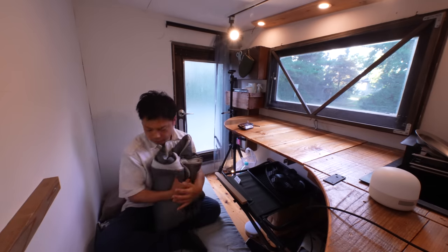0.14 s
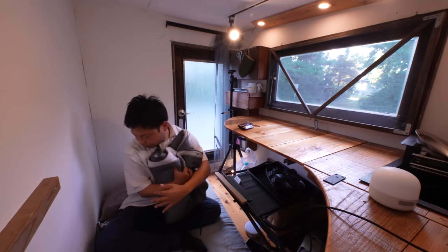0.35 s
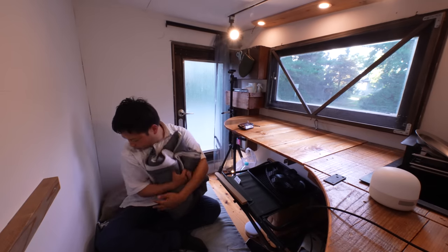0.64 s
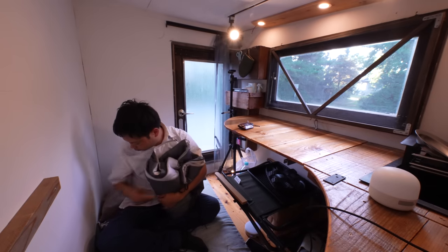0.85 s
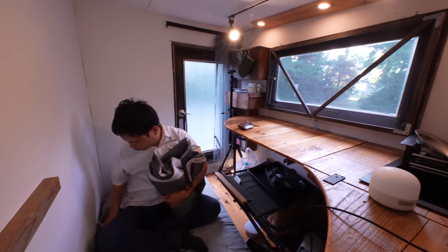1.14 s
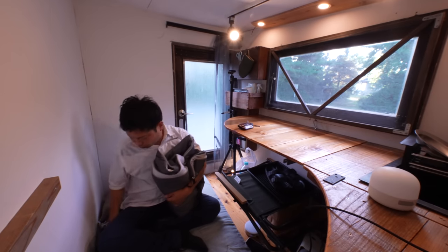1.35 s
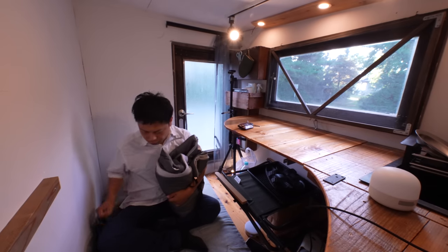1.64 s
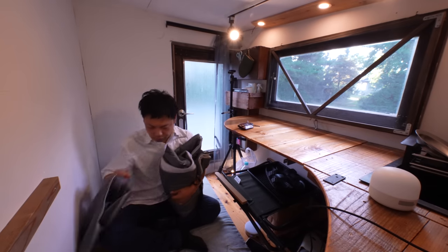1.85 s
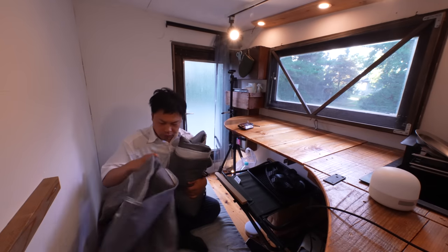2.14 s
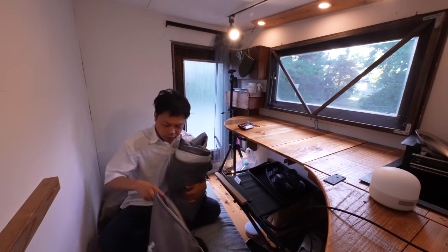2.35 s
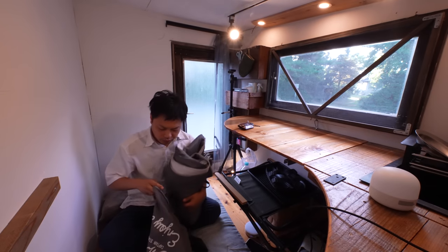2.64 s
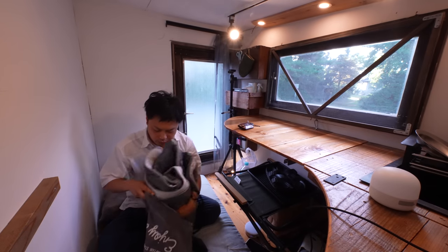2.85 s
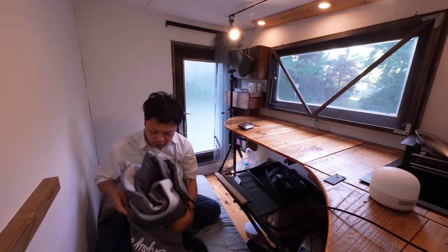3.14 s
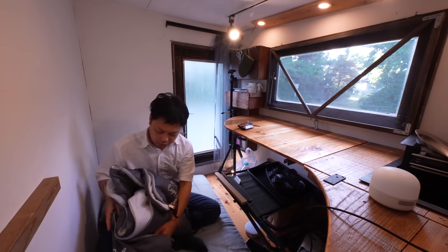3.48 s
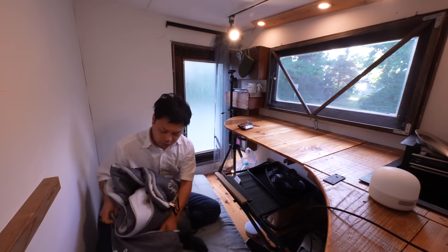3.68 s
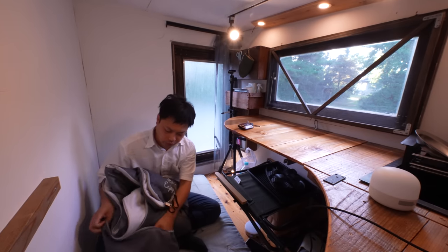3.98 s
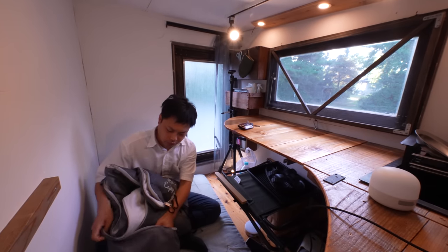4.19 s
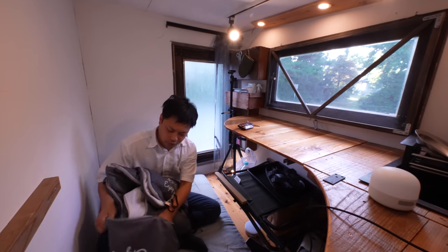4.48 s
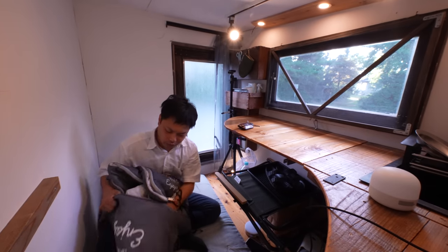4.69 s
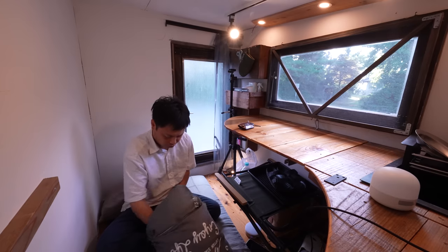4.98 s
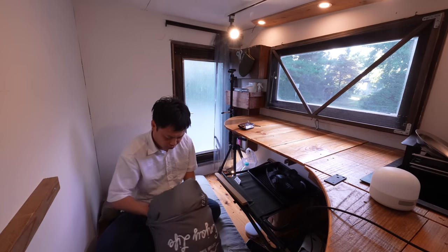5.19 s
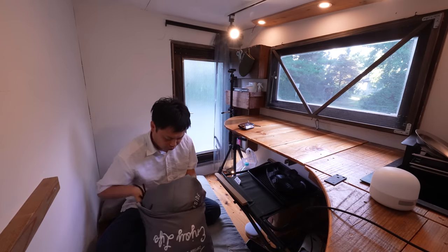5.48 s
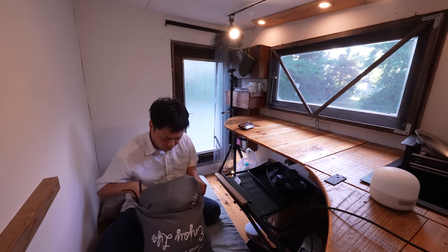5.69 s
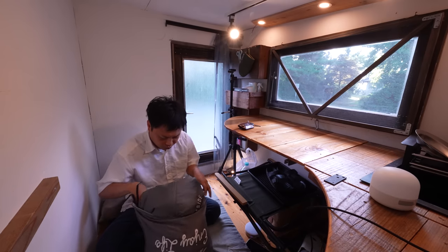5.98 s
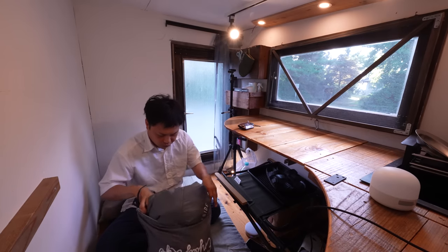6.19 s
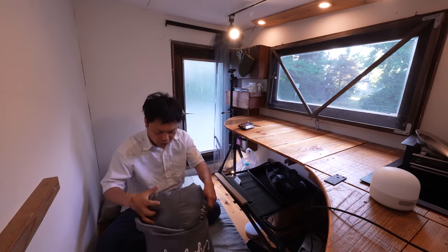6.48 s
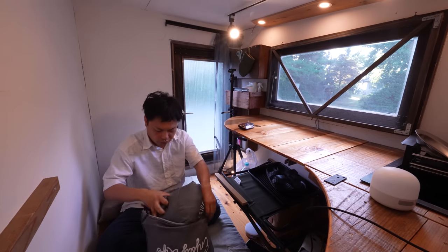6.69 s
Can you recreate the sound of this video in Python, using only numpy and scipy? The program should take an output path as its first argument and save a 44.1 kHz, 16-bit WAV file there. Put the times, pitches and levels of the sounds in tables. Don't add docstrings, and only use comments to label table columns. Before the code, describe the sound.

A padded nylon sleeping bag is handled close to a microphone in a small wooden cabin, with short reflections, faint outdoor rumble and light hiss. From 0 to 1 s, soft swishes come with crease snaps, dull knee bumps and woody raps, swelling to a brighter rustle near 0.85. At 1.3 a very loud, hard knock on a bench rebounds several times within 0.05 s, rattling briefly. Around 1.66-1.72 an edge skids in a rasping stutter, and crisp bright fabric strokes continue to 1.9. From 2 to 3 s rubbing is softer, with raps near 2.4 and thin ticks at 2.6. Sharp metallic-plastic ticks sound at 3.06, a rap at 3.25, then quiet stuffing. A fuller rustle and low thumps arrive at 4.85, with steady swishing after. Ticks and a rap cluster at 6.37; brief squeaks and a rising chirp occur at 6.6-6.8 amid rubbing.

```python
import sys
import numpy as np
from scipy import signal
from scipy.fft import rfft, irfft, next_fast_len
from scipy.io import wavfile
from scipy.ndimage import uniform_filter1d

SR = 44100
rng = np.random.default_rng(int(sys.argv[2]) if len(sys.argv) > 2 else 0)


def attenuation_scalar(level_db):
    decades = np.asarray(level_db, float) / 20
    return 10 ** decades


def to_wav(s):
    ch = np.atleast_2d(s).T
    pcm = np.round(np.clip(ch, -1, 1) * 32767)
    wavfile.write(sys.argv[1], SR, pcm.astype(np.int16))


N = 301203

# frequency_hz, density_db (per Hz)
CLOTH = [(60, -35), (100, -5), (135, -2.5), (174, 3.5), (229, -4), (335, -1), (481, -10.5), (621, -8),
         (1230, -6.5), (1480, -17.5), (2000, -17), (4000, -16.5), (8000, -27), (16000, -31)]
# peak_s, level_db, rise_s, fall_s
SQUEEZES = [(0.0, -54, .1, 0.3), (.15, -60, .3, 0.37), (.37, -49.5, 0.44, 0.24), (.72, -81, .3, 0.98),
            (.836, -44.5, 0.23, 0.064), (1.03, -63, 0.9, 0.069), (1.4, -66, 0.32, 0.27),
            (1.558, -59, 0.11, 0.034), (1.76, -54.5, 0.25, 0.25), (2.19, -56, 1, 0.082),
            (2.628, -52, 0.4, 0.09), (2.8, -55.5, 0.26, 0.51), (3.2, -71, 0.25, .3),
            (3.389, -53.5, 0.36, 0.19), (3.7, -63.5, 0.12, 0.89), (3.93, -71, 0.59, 0.68),
            (4.3, -70.5, 0.6, 0.31), (4.852, -47.5, 0.29, 0.092), (5.13, -51.5, 0.48, 0.45),
            (5.37, -53.5, 0.52, 0.82), (5.85, -86, 0.4, 0.08), (6.1, -64.5, 0.15, 0.96),
            (6.43, -56, 0.27, 0.091), (6.616, -52, 0.21, 0.45), (6.8, -63, .5, 0.19)]


def evened(x):
    return x / np.sqrt(np.mean(x ** 2) + 1e-20)


def read(points, hz):
    f, value = np.transpose(points)
    return np.interp(np.log(hz + 1), np.log(f + 1), value)


def add(mix, start_s, sound):
    part = mix[round(start_s * SR):][:len(sound)]
    part += sound[:len(part)]


def coloured(x, points, low_hz=17.0, high_hz=40300.0, skirt=0.31):
    size = next_fast_len(len(x))
    hz = np.fft.rfftfreq(size, 1 / SR) + 1
    above_low = 1 / (1 + np.exp(-np.log2(hz / low_hz) / skirt))
    above_high = 1 / (1 + np.exp(-np.log2(hz / high_hz) / skirt))
    gain = attenuation_scalar(read(points, hz)) * np.sqrt(above_low * (1 - above_high))
    return irfft(rfft(x, size) * gain, size)[:len(x)]


def wander(hz):
    b, a = signal.butter(2, hz / (SR / 2))
    return evened(signal.lfilter(b, a, rng.standard_normal(N)))


def slips(per_s, spread_db, hiss, clump_db, clump_hz):
    size = attenuation_scalar(spread_db * np.minimum(rng.exponential(1, N), 5)) * rng.standard_normal(N)
    clicks = evened(size * (rng.random(N) < per_s / SR))
    return (clicks + hiss * rng.standard_normal(N)) * attenuation_scalar(clump_db * wander(clump_hz))


def swell(peak_s, level_db, rise_s, fall_s):
    grid = np.arange(0, N + 64, 64)
    since = grid / SR - peak_s[:, None]
    away = np.where(since < 0, since / rise_s[:, None], -since / fall_s[:, None])
    power = (attenuation_scalar(level_db[:, None] + 20 * away) ** 2).sum(0)
    return np.interp(np.arange(N), grid, 10 * np.log10(power + 1e-12))


def mottled(x, depth_db, wide, long):
    z = signal.stft(x, nperseg=512)[2]
    patches = uniform_filter1d(rng.standard_normal(z.shape[::-1]).T, wide, axis=0)
    patches = evened(uniform_filter1d(patches, long, axis=1))
    return signal.istft(z * attenuation_scalar(depth_db * patches), nperseg=512)[1][:N]


def cloth():
    # peak_s, level_db, rise_s, fall_s,
    # brightness_db
    strokes = [(0.0, -50.5, .1, 0.09, -4), (.084, -54, 0.013, 0.12, -13),
               (.143, -76, 0.023, .15, -5), (.41, -47.5, 0.91, 0.27, -2.5),
               (.51, -61, .1, 0.05, -15), (.605, -56, 0.033, .3, -8), (.72, -53.5, 0.2, 0.22, -5),
               (.84, -43.5, 0.2, 0.094, 0.5), (1.03, -55, 0.45, 0.1, -3.5), (1.2, -70, .3, .3, -5),
               (1.43, -58.5, 0.097, 0.071, -7.5), (1.558, -53.5, 0.073, 0.1, -41),
               (1.684, -42, 0.08, 0.14, 1), (1.75, -49.5, 0.11, 0.16, 12.5),
               (1.82, -46, 0.09, .15, 6.5), (1.895, -47, 0.15, 0.037, 7.5),
               (1.98, -56, 0.33, 0.36, 1.5), (2.18, -55, 0.93, 0.12, -3.5),
               (2.4, -55.5, 0.067, 0.67, -13), (2.62, -53, 0.24, 0.13, -7),
               (2.79, -55.5, 0.72, 1.3, -3), (2.93, -55.5, 0.89, 0.22, -13),
               (3.18, -62, 0.17, 0.27, -15), (3.26, -54.5, 0.042, 0.71, -18),
                     (3.42, -57, 0.44, 0.16, -3), (3.77, -58.5, 0.19, 0.58, -6),
                     (3.92, -57.5, 0.33, 0.084, -0.5), (4.025, -61, 0.089, 0.079, -7),
                     (4.25, -69.5, 0.86, 1, 3), (4.64, -54.5, 0.22, 1, -2.5), (4.84, -44, 0.2, 0.11, 2.5),
                     (5.12, -52.5, 0.4, 0.32, 2.5), (5.37, -51, 0.67, 0.81, -3.5), (5.62, -52, 1, 0.2, 0),
                     (5.74, -53.5, 0.098, 0.23, 0.5), (5.879, -57.5, 0.44, 0.04, -4),
                     (6.1, -53.5, 0.22, 0.21, -3.5), (6.33, -55, 0.41, 0.27, -5),
                     (6.43, -53, 0.26, 0.23, -2.5), (6.55, -49.5, 0.051, 0.36, -13),
                     (6.62, -51.5, 0.28, 0.88, -0.5), (6.83, -50, 0.16, 0.12, -7)]
    peak_s, db, rise, fall, bright = np.transpose(strokes)
    fizz = coloured(slips(1600, 1.3, 3.3, 0.93, 42), CLOTH, low_hz=9300.0, skirt=0.23)
    sheen = coloured(slips(2000, 2.4, 2.7, 1.2, 37), CLOTH, 5200.0, 7670.0, 0.28)
    swish = coloured(slips(1200, 2.0, 2.14, 0.72, 26), CLOTH, 1556.0, 5650.0, 0.067)
    padding = coloured(slips(400, 1.8, 1.6, 0.27, 33), CLOTH, 530.0, 1380.0)
    fizz_db = swell(peak_s, db - 1.54 + 1.17 * bright, rise, fall)
    sheen_db = swell(peak_s, db - 2.5 + 0.73 * bright, rise, fall)
    swish_db = swell(peak_s, db, rise, fall)
    padding_db = swell(*np.transpose(SQUEEZES))
    parts = ((fizz, fizz_db), (sheen, sheen_db), (swish, swish_db), (padding, padding_db))
    rubbing = sum(evened(x) * attenuation_scalar(level) for x, level in parts)
    return mottled(rubbing, depth_db=1.43, wide=4, long=12)


def boards():
    peak_s, db, rise, fall = np.transpose(SQUEEZES)
    delay_s, lag_s = 0.022, 0.16
    pressure_db = uniform_filter1d(swell(peak_s + delay_s, db, rise, fall), round(lag_s * SR))
    pushes = evened(coloured(slips(150, 2.5, 1.64, 2.1, 6.0), CLOTH, 120.0, 325.0))
    return pushes * attenuation_scalar(-58.5 + 0.57 * (pressure_db - np.median(pressure_db)))


def squeaks():
    # start_s, length_ms, level_db, start_hz, end_hz
    glides = [
        (3.52, 26, -55, 1710, 1670),
        (6.444, 16, -48, 1980, 1960),
        (6.757, 24, -47, 680, 860),
        (6.771, 26, -44, 850, 970),
        (6.803, 22, -49, 1030, 1300),
        (6.674, 14.3, -42, 404, 720),
        (6.627, 10, -45, 2080, 1400),
    ]
    # start_s, length_ms, level_db, centre_hz, width_hz
    rasps = [(.81, 35, -49, 910, 500), (1.66, 59, -33.5, 2030, 2000), (1.58, 120, -49, 10800, 1600),
             (1.585, 56, -57, 7700, 900), (1.625, 36, -52, 6900, 700), (1.668, 31, -34.5, 1130, 210),
             (1.662, 51, -45, 3800, 1000), (8.3, 40, -49, 4250, 400), (6.372, 25, -40, 4100, 1500),
             (5.06, 82, -56, 750, 110), (5.2, 84, -58, 630, 87), (5.27, 77, -58, 618, 80),
             (5.34, 100, -59, 637, 90), (2.525, 33, -56.5, 4100, 500), (6.634, 18, -54, 4250, 400),
             (1.665, 54, -43.5, 700, 440), (2.552, 61, -50.5, 3600, 5400), (6.365, 33, -44, 2260, 5800),
             (6.665, 44, -48.5, 720, 580)]
    # bandwidth in Hz, steady slip against flutter
    rows = [(s, ms, db, hz0, hz1, 0.2 * hz0, 2.1) for s, ms, db, hz0, hz1 in glides]
    rows += [(s, ms, db, hz, hz, width, 0) for s, ms, db, hz, width in rasps]
    out = np.zeros(N)
    for start_s, ms, db, hz0, hz1, width, tone in rows:
        count = round(min(ms, 90) * SR / 1000)
        carrier = np.exp(2j * np.pi * np.cumsum(np.linspace(hz0, hz1, count)) / SR)
        r = np.exp(-np.pi * width / SR)
        grit = rng.standard_normal(4096) + 1j * rng.standard_normal(4096)
        flutter = signal.lfilter([1], [1, -2 * r, r * r], grit)[-count:]
        slip = flutter / abs(flutter).mean() + tone
        add(out, start_s, attenuation_scalar(db) * evened((carrier * slip).real) * np.sqrt(np.hanning(count)))
    return out


def causal(db):
    cepstrum = irfft(np.log(attenuation_scalar(db)))
    half = len(cepstrum) // 2
    fold = np.r_[1, np.full(half - 1, 2), 1, np.zeros(half - 1)]
    return np.exp(rfft(cepstrum * fold))


def ticks(rows, octaves):
    out = np.zeros(N)
    t = (np.arange(2048) - 128) / SR
    hz = np.fft.rfftfreq(2048, 1 / SR) + 1
    for start_s, db, centre_hz, ms in rows:
        lean_db = np.maximum(-6 * (np.log2(hz / centre_hz) / octaves) ** 2, -60)
        snap = 3.5 * np.sqrt(ms) * (t == 0)
        decay = np.exp(-abs(t) * 1000 / ms) * (t >= 0)
        shake = (rng.standard_normal(2048) + snap) * decay
        burst = irfft(rfft(shake) * causal(lean_db + read(CLOTH, hz)))
        add(out, start_s + t[0], attenuation_scalar(db) * burst / abs(burst).max())
    return out


def creases():
    # start_s, peak_db, centre_hz, length_ms
    snaps = [(.0838, -32, 1500, 2.1), (.1402, -32, 1880, 3.8), (.3085, -34, 1890, 1.3),
             (.3625, -39, 1400, 1.5), (.587, -40.5, 2000, 2), (.678, -38, 2400, 1.3),
             (.9301, -35.5, 11300, 2.4), (1.0125, -49, 3980, 3.2), (2.319, -42, 2000, 1.1),
             (2.4893, -43.5, 6500, 1), (2.562, -33, 4000, 2.5), (.872, -27.5, 13000, 6.3),
             (2.5636, -39, 11900, 1.5), (2.8993, -42, 10000, 1), (3.8217, -41, 7250, 0.94),
             (1.014, -42, 9000, 5), (3.0573, -32, 7050, 2.7), (3.248, -36.5, 2780, 2),
             (3.2575, -33.5, 2300, 3), (3.066, -36, 6000, 9.6), (3.7693, -44, 4220, 3),
             (3.897, -53, 3860, 5), (6.293, -45, 3340, 8.8), (6.5465, -28.5, 11100, 2.7)]
    return ticks(snaps, octaves=0.79)


def ring(modes, lean_db, stretch):
    t = np.arange(SR // 4) / SR
    hz, db, t60 = np.transpose(modes)[:, :, None]
    sign = (-1.) ** np.arange(len(modes))[:, None]
    decay = attenuation_scalar(db + lean_db - 60 * t / (t60 * stretch))
    return (sign * decay * np.sin(2 * np.pi * hz * t)).sum(0)


def cord_lock():
    # start_s, peak_db, centre_hz, length_ms
    clicks = [(.0717, -41, 6900, 1.5), (.73, -44, 11500, 2.5), (2.591, -58, 6500, 1.3),
              (2.591, -35, 15300, 3.6), (2.601, -39, 15400, 4), (1.312, -35, 4220, 1.8),
              (1.341, -31, 4240, 5), (1.35, -45, 4200, 3.6), (3.058, -33, 15700, 3),
              (3.059, -28, 10800, 4.7), (3.071, -29, 14800, 6), (6.3575, -33, 7660, 0.83),
              (6.363, -36, 3200, 4), (6.547, -31, 13500, 2.3), (6.369, -29, 9100, 2.8),
              (6.372, -31, 3900, 6.3), (6.378, -35, 14800, 9), (6.385, -31.5, 9300, 3.5),
              (6.4873, -41, 4280, 4.4), (6.567, -36, 9900, 2.7), (6.569, -33, 14300, 4)]
    # start_s, frequency_hz, level_db, t60_s
    tones = [(3.059, 6150, -41, .03), (3.0575, 4150, -47, .09), (3.0585, 15500, -27, .02),
             (3.06, 11500, -42, .03), (3.062, 5200, -45, .05), (3.385, 5400, -56, .05),
             (2.592, 15100, -45, .07), (2.592, 7810, -51, .05), (2.566, 13900, -51, .07),
             (.862, 13700, -52, .08), (.862, 9650, -53, .07), (6.567, 10050, -41, .05),
             (6.357, 7890, -42, .02), (6.372, 9650, -47, .13), (6.372, 13700, -50, .15),
             (6.387, 5200, -36, .045), (6.384, 4250, -43, .035), (6.385, 9700, -43, .06),
             (6.553, 13700, -51, .15), (6.6, 9650, -54, .25), (6.487, 13700, -53, .05)]
    rings = np.zeros(N)
    for start_s, *mode in tones:
        add(rings, start_s, ring([mode], 0, 0.84))
    return ticks(clicks, octaves=0.27) + rings * attenuation_scalar(4 * wander(120))


def bumps(rows, stretch):
    # frequency_hz, level_db, t60_s
    panels = [(64.4, -15, 0.47), (108, -5, 0.17), (175, -3.5, 0.27), (212, -9, 0.21), (275, 4, 0.1),
              (327.8, -3.5, 0.21), (419, -1, 0.099), (504, -13, 0.24), (615, 7, 0.048), (800, 7, 0.045),
              (890, 18, 0.022), (1018, 12, 0.08), (1125, 13, 0.04), (1940, 13, 0.066), (2700, -10, .03)]
    out, hz = np.zeros(N), np.transpose(panels)[0][:, None]
    for start_s, db, centre_hz, octaves in rows:
        lean_db = -6 * (np.log2(hz / centre_hz) / max(octaves, 0.2)) ** 2
        grit = 1 + 0.59 * rng.standard_normal(256)
        contact = grit * np.exp(-6.5 * centre_hz * np.arange(256) / SR)
        sound = signal.oaconvolve(ring(panels, lean_db, stretch), contact)
        add(out, start_s, attenuation_scalar(db) * sound / abs(sound).max())
    return out


def thuds_and_raps():
    # start_s, peak_db, centre_hz, spread_octaves
    thuds = [(.157, -31, 286, 0.86), (.17, -35, 73.5, 0.3), (.185, -38.5, 333, 0.55), (.286, -37, 363, 0.4),
             (.373, -36.5, 175, 0.65), (.591, -43, 182, 0.21), (.751, -35.5, 322, 0.8),
             (.843, -36, 178, 0.92), (1.725, -32.5, 186, 0.48), (1.797, -27, 233, 1.1),
             (2.384, -40.5, 229, 0.58), (2.422, -32.5, 330, 1.3), (2.799, -44, 170, 0.82),
             (2.968, -41.5, 220, 1.5), (3.269, -43, 261, 0.095), (4.885, -37.5, 200, 0.76),
             (4.903, -32.5, 168, 0.37), (4.979, -37, 275, 0.22), (5.135, -38, 178, 0.89),
             (5.19, -40.5, 189, 0.42), (5.561, -38, 149, 0.54), (5.605, -41.5, 202, 0.38),
             (6.222, -44.5, 186, 0.54), (.681, -41.5, 167, 0.51), (1.897, -39, 171, 0.8),
             (2.69, -48, 315, 0.17), (3.37, -61, 202, 0.33), (4.756, -52, 250, 0.46),
             (5.02, -42.5, 180, 0.97), (5.052, -44, 199, .5), (5.24, -44, 175, 0.58),
             (5.36, -49, 380, 0.29), (5.42, -42.5, 170, 0.47), (1.81, -39, 303, 1.03)]
    # start_s, peak_db, centre_hz, spread_octaves
    raps = [(.083, -50, 1210, 0.63), (.141, -31.5, 463, 0.84), (.247, -27.5, 597, 0.65),
            (.309, -48, 800, 0.93), (.363, -31.5, 890, 1.3), (.258, -50, 700, .8), (.54, -41.5, 680, 0.58),
            (.59, -41, 646, 0.31), (.679, -38.5, 550, 0.61), (1.694, -32, 417, 0.39),
            (2.318, -52, 1100, 0.32), (2.376, -40.5, 717, 0.17), (2.405, -29.5, 455, 0.84),
            (3.2478, -30.5, 860, 0.87), (3.251, -37, 298, 0.84), (3.268, -47, 330, .6),
            (3.378, -42, 1100, 0.84), (6.374, -29.5, 647, 0.41), (6.672, -39.5, 1060, 0.35),
            (6.688, -38, 1050, .4), (1.539, -50.5, 602, 0.44), (.38, -43, 700, 1.1)]
    return bumps(thuds, stretch=0.54) + bumps(raps, stretch=0.87)


def skid():
    # start_s, level_db
    jerk_rows = [(1.661, -39), (1.665, -47), (1.669, -31), (1.6738, -30), (1.6768, -33), (1.6785, -23.5),
                 (1.6803, -30), (1.6822, -32), (1.684, -30), (1.688, -28), (1.690, -47), (1.6915, -25),
                 (1.6943, -21.5), (1.699, -34), (1.701, -30), (1.705, -39), (1.709, -38), (1.7145, -42),
                 (1.72, -37)]
    # frequency_hz, level_db, t60_s
    modes = [(690, -16, .02), (1142, 0, 0.024), (1500, -5, .012), (2160, -3, .015), (2360, -3, 0.013),
             (3080, -14, 0.0072), (3900, -5, 0.0089)]
    start_s, db = np.transpose(jerk_rows)
    jerks = np.zeros(N)
    jerks[(start_s * SR).astype(int)] = -attenuation_scalar(db)
    body = sum(ring([mode], 0, 1) for mode in modes)
    return attenuation_scalar(3.5) * signal.oaconvolve(jerks, body / abs(body).max())[:N]


def knocks():
    # start_s, peak_db, contact_ms, rattle_db, free_ring_ms
    blows = [
        (1.303, -5.5, 1.18, -35.5, 9.8),
        (1.308, -11, 3.3, -51, 7.4),
        (1.3146, -9.5, 2.1, -51, 2.6),
        (1.33, -13, 0.87, -36.5, 10.6),
        (1.3372, -9.5, 2.8, -35.5, 11),
    ]
    # frequency_hz, level_db, t60_s
    bench = [(172, 0.5, 0.12), (318, -1, 0.079), (199, -31, 0.12), (510, -3, 0.042), (278, -25, 0.13),
             (417, -1.5, 0.074), (107.7, -6, 0.66), (600, -3, 0.041), (74, -35, 0.47), (935, -2, 0.028),
             (780, -3, 0.074), (1100, -32, .03)]
    out, body, t = np.zeros(N), ring(bench, 0, 0.74), np.arange(4096) / SR
    since_ms = np.arange(len(body)) * 1000 / SR
    for start_s, db, contact_ms, rattle_db, free_ms in blows:
        choked = body * attenuation_scalar(-22 * np.clip((since_ms - free_ms) / 3.4, 0, 1))
        contact = np.sin(np.pi * np.minimum(t[:512] * 1000 / contact_ms, 1))
        sound = signal.oaconvolve(choked, np.clip(contact, 0, 1))
        add(out, start_s, attenuation_scalar(db) * sound / abs(sound).max())
        rattle = evened(coloured(rng.standard_normal(4096), CLOTH, 1800.0, 7800.0, 0.52))
        add(out, start_s, attenuation_scalar(rattle_db - 60 * t / 0.13) * rattle)
    return out


def cabin(x):
    # frequency_hz, t60_s
    decay_times = [(100, .25), (500, .17), (2000, .14), (6000, .13), (15000, .11)]
    taps = np.zeros(SR // 2)
    at = np.arange(60, len(taps) - 12, 12)
    taps[at + rng.integers(0, 12, len(at))] = rng.choice([-1., 1.], len(at))
    hz, t, z = signal.stft(taps, SR, nperseg=256)
    decay = attenuation_scalar(-60 * t / read(decay_times, hz)[:, None])
    tail = signal.istft(z * decay, SR, nperseg=256)[1]
    return signal.fftconvolve(x, tail / np.linalg.norm(tail))[:N]


def still():
    # frequency_hz, density_db (per Hz)
    spectrum = [(18, -30), (33, -5), (52, 4.5), (70, 13), (90, 6.5), (124, -8), (233, -18), (328, -18),
                (461, -19), (1010, -15.5), (1630, -43), (3000, -38), (8000, -28.5), (16000, -36)]
    noise = rng.standard_normal(N)
    rumble = coloured(noise, spectrum, high_hz=135.0) * attenuation_scalar(0.5 * wander(1.0))
    hiss = coloured(noise, spectrum, low_hz=137.0)
    return attenuation_scalar(-55.5) * evened(rumble + hiss)


def scene():
    taut, snaps, sharp = squeaks(), creases(), cord_lock()
    impacts = [thuds_and_raps() + skid(), knocks()]
    b, a = signal.butter(3, 63.0 / (SR / 2), "high")
    small, heavy = signal.lfilter(b, a, impacts)
    spots = taut + snaps + sharp + small + heavy
    sent = attenuation_scalar(-6.0) * taut + attenuation_scalar(-7.5) * snaps + attenuation_scalar(1.5) * sharp + attenuation_scalar(-9.0) * small + attenuation_scalar(-8.0) * heavy
    return (cloth() + boards() + spots + cabin(sent) + still())[None]


def roll_off(x):
    return signal.sosfilt(signal.butter(12, 16980, fs=SR, output="sos"), x)


def record(dry):
    # frequency_hz, level_db
    housing = [(3000, -0.5), (3700, -2.5), (4250, 1), (4600, -2.5), (4850, -9.5), (5600, -5.5), (6600, 0.5),
               (7400, 1.5), (8500, 5.5), (9000, 2), (9400, -1.5), (10800, 1.5), (14000, 2), (15300, 1)]
    # delay_ms, share, phase_cycles
    table_bounce = (1.34, .12, .75)
    size = next_fast_len(N)
    hz = np.fft.rfftfreq(size, 1 / SR)
    delay_ms, share, phase_cycles = table_bounce
    bounce = 1 + share * np.exp(-2j * np.pi * (hz * delay_ms / 1000 - phase_cycles))
    response = bounce * attenuation_scalar(read(housing, hz)) * (hz < 15870)
    heard = irfft(rfft(dry, size) * response, size)[:, :N]
    return roll_off(heard)


dry = scene()
out = record(dry)
to_wav(out)
```